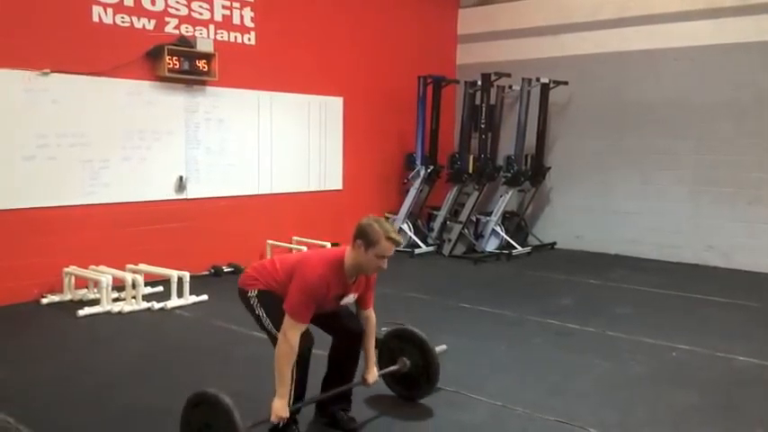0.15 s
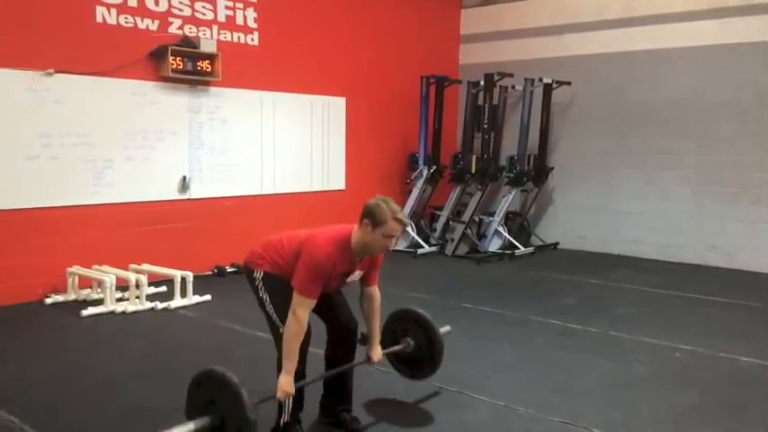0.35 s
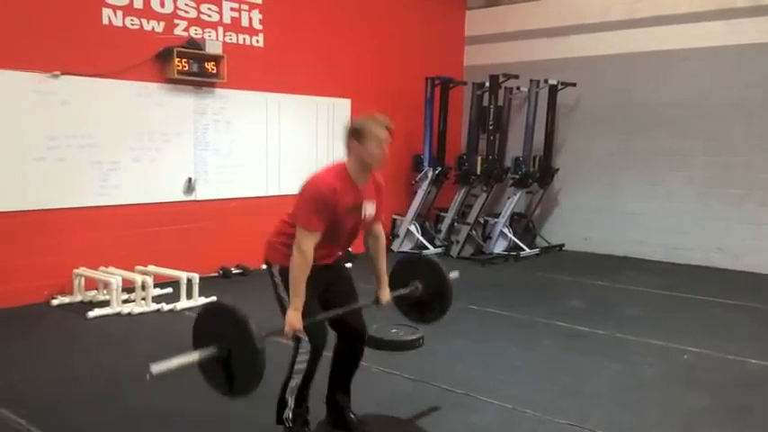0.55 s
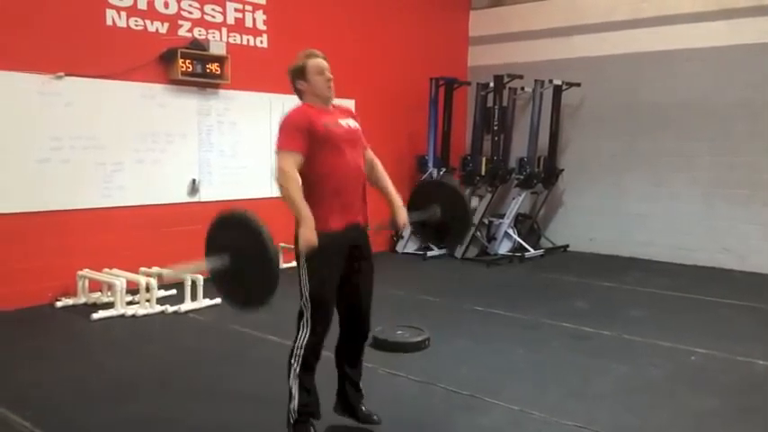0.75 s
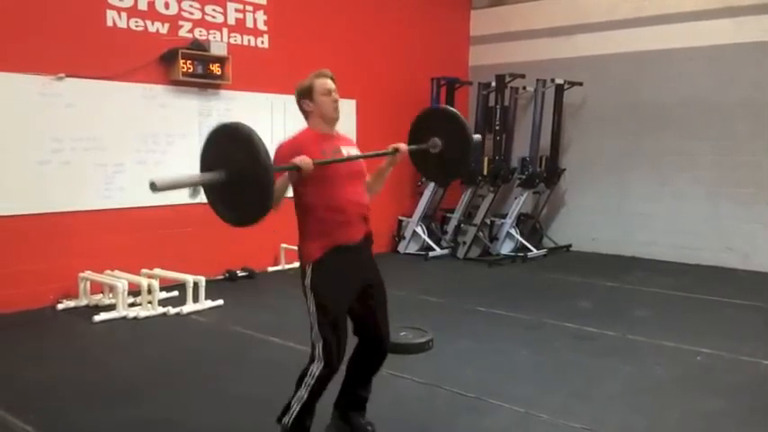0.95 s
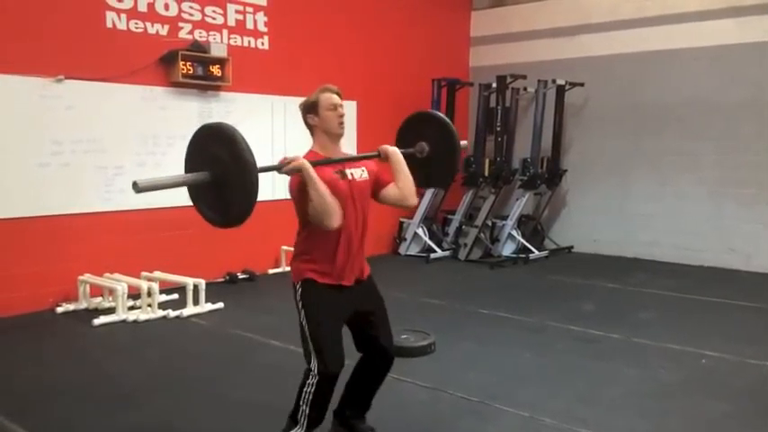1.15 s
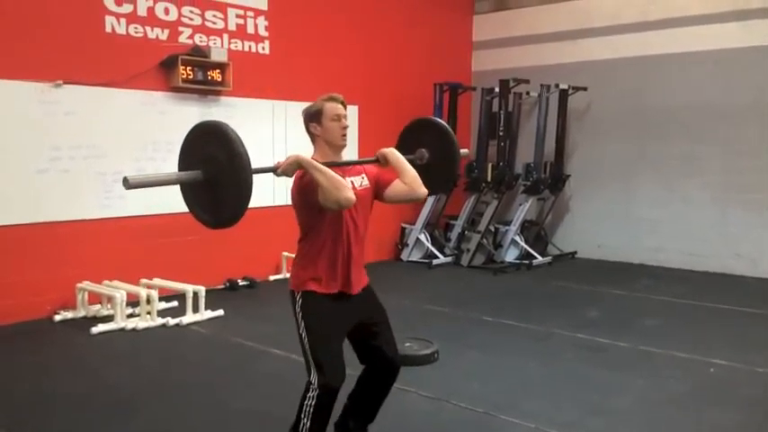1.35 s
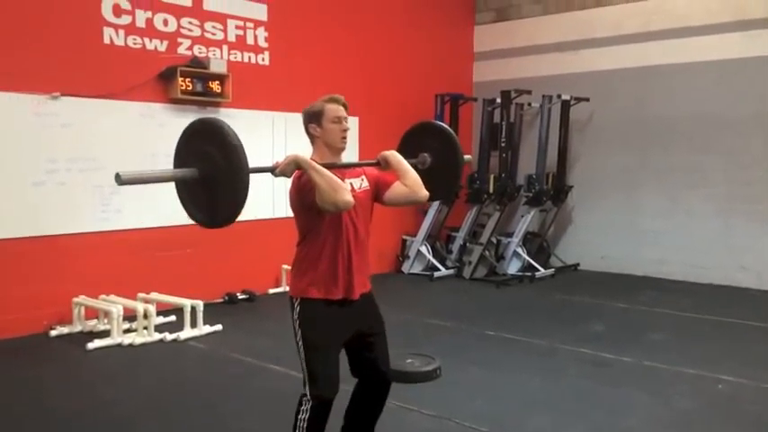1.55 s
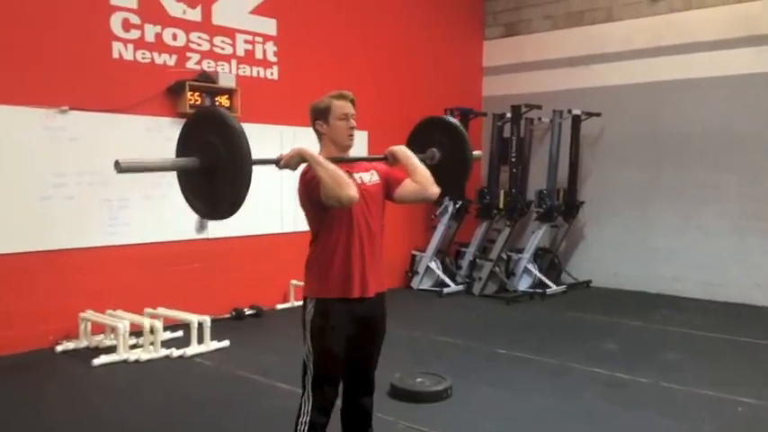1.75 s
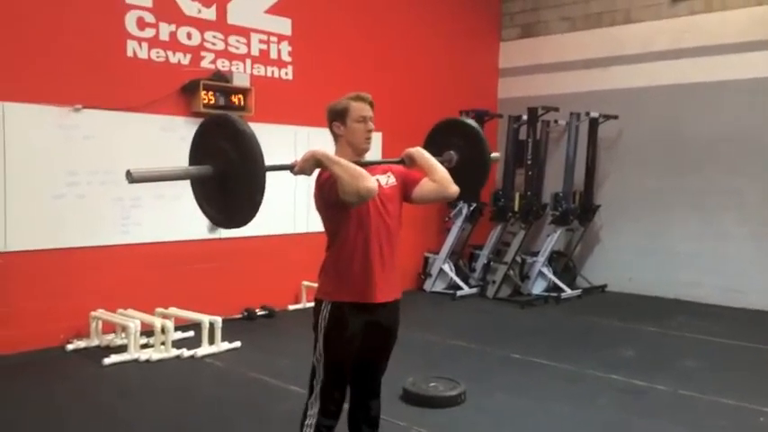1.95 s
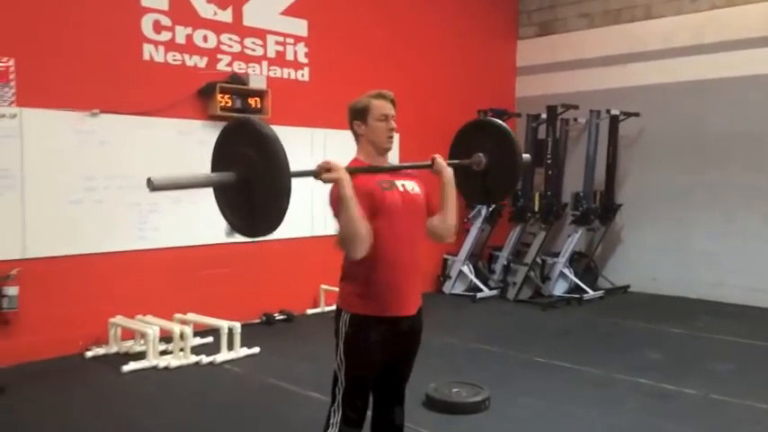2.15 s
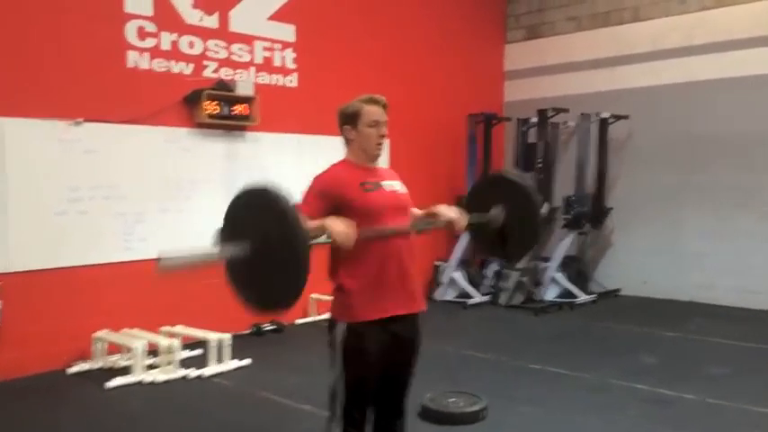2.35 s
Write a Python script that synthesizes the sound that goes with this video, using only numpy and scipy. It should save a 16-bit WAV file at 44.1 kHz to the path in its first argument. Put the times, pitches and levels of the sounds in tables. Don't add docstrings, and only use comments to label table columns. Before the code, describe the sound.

Bright steel barbell clatter with ringing sleeves and plates, then softer rubber slaps and dull knocks

```python
import sys
import numpy as np
from scipy import signal
from scipy.fft import rfft, irfft
from scipy.io import wavfile
from scipy.ndimage import uniform_filter1d

SR = 44100
rng = np.random.default_rng(int(sys.argv[2]) if len(sys.argv) > 2 else 0)


def persist_wave(psi):
    counts = np.round(np.clip(psi, -1, 1) * 32767).astype(np.int16)
    wavfile.write(sys.argv[1], SR, np.atleast_2d(counts).T)


def how_loud(loudness_db):
    steps = np.asarray(loudness_db, float) / 20
    return 10 ** steps


N = 110250


def evened(x):
    return x / np.sqrt(np.mean(x ** 2) + 1e-20)


def read(points, hz):
    f, value = np.transpose(points)
    return np.interp(np.log(hz + 1), np.log(f + 1), value)


def add(mix, s, sound):
    part = mix[round(s * SR):][:len(sound)]
    part += sound[:len(part)]


def coloured(x, points, tilt_db=0):
    hz = np.fft.rfftfreq(len(x), 1 / SR)
    gain_db = read(points, hz) - tilt_db * np.log2(hz / 3000 + 0.21)
    return irfft(rfft(x) * how_loud(gain_db), len(x))


def ring(x, hz, width):
    r = np.exp(-np.pi * width / SR)
    w = 2 * np.pi * hz / SR
    return signal.lfilter([(1 - r) * 2 * np.sin(w)], [1, -2 * r * np.cos(w), r * r], x)


# frequency in Hz, density in dB per Hz.
HUM_SPECTRUM = [(25, -29.5), (45, -8), (93, -2), (204, -6), (300, -15.5), (1000, -24.5), (1750, -23),
                (2600, -32), (15500, -47.5)]
HUM_DB = -56.5


def hum():
    lumps = evened(uniform_filter1d(rng.standard_normal(N), 3000))
    air = evened(coloured(rng.standard_normal(N), HUM_SPECTRUM + [(16000, -88)]))
    low = signal.sosfilt(signal.butter(2, 300, fs=SR, output="sos"), air)
    swell = how_loud(.8 * np.tanh(lumps)) - 1
    return how_loud(HUM_DB) * (air + low * swell)


# frequency in Hz, density in dB per Hz.
LINGER_SPECTRUM = [(290, -46.5), (500, -15.5), (610, 0), (755, -15), (1720, -8.5), (2610, -11.5),
                   (15000, -29)]
LINGER_DB, LINGER_T60_S = -63, 1.5


def linger():
    fall_db = 60 * np.arange(N) / SR / LINGER_T60_S
    return evened(coloured(rng.standard_normal(N), LINGER_SPECTRUM)) * how_loud(LINGER_DB - fall_db)


# frequency in Hz, density in dB per Hz.
CLOTH_SPECTRUM = [(1760, -55), (3000, -21), (5450, 1), (6050, 5), (8350, 5), (15500, 9)]
# middle in seconds, level in dB, half width in seconds.
BRUSHES = [
    (0.707, -58.5, 0.049),
    (.85, -72.5, .08),
    (2.275, -65, 0.023),
    (2.32, -75, 0.058),
    (1.102, -70, 0.11),
    (1.3, -73.5, 0.19),
    (1.821, -79, 0.083),
]


def brushes():
    t = np.arange(N) / SR
    hiss = evened(coloured(rng.standard_normal(N), [(1500, -41)] + CLOTH_SPECTRUM + [(16000, -80)]))
    return hiss * sum(how_loud(db) * np.exp(-((t - s) / half) ** 2) for s, db, half in BRUSHES)


# start in seconds, peak in dB, pitch in Hz, 60 dB decay in seconds.
THUMPS = [
    (0.019, -49.5, 82, 0.12),
    (.232, -41, 171, 0.18),
    (.24, -42, 89.5, 0.13),
    (0.264, -39, 104, 0.081),
    (0.261, -42, 134.3, .12),
    (1.002, -54.5, 156.6, 0.1),
]


def thumps():
    out, t = np.zeros(N), np.arange(12000) / SR
    for s, db, hz, t60 in THUMPS:
        swell = 1 - np.exp(-t / .012)
        add(out, s, how_loud(db - 60 * (t / t60) ** 2) * swell * 2 * np.sin(2 * np.pi * hz * t))
    return coloured(out, [(40, -20), (70, 1.0)])


# start in seconds, peak in dB, pitch in Hz, tick in dB.
SLAPS = [
    (.2186, -24, 850, -30),
    (.2218, -30, 600, -30),
    (.9804, -25, 1000, -16),
    (.9822, -36, 1500, -9),
    (.9957, -20, 1200, 2),
    (1.002, -33, 1300, -20),
    (1.0168, -34, 1400, 9),
    (1.027, -38, 2500, 1),
    (2.3445, -46, 680, -18),
]
SLAP_RING_CYCLES, TICK_S = .3, .00003


def slaps():
    out, t = np.zeros(N), np.arange(600) / SR
    for s, db, hz, tick_db in SLAPS:
        u = t * hz / SLAP_RING_CYCLES
        pocket = 2 * u ** 2 * np.exp(-u) * np.sin(2 * np.pi * hz * t - 2.4)
        tick = -how_loud(tick_db) * np.exp(-((t - .0003) / TICK_S) ** 2)
        add(out, s, how_loud(db) * (pocket + tick))
    return signal.sosfilt(signal.butter(2, 400, "high", fs=SR, output="sos"), out)


CHATTER_PER_S, CHATTER_SPREAD_DB, CONTACT_S = 14000, 4.5, 0.0011
SLEEVE_DB, SLEEVE_WIDTH_HZ = -2, 330
LOUDEST_DB, LOUDEST_WIDTH = -5.5, 0.067
LEAD = 64


def chatter(table, colour):
    out, t = np.zeros(N), np.arange(4096) / SR
    for s, db, length, dull_db, top_hz in table:
        hit, size, sign = rng.random((3, 4096))
        strength = how_loud(-CHATTER_SPREAD_DB * np.log(size + 0.04)) * np.sign(sign - .5)
        ticks = (hit < CHATTER_PER_S / SR) * strength
        ticks[0] = 2
        ticks = ticks * np.exp(-(t / length) ** 2) * (.3 + .7 * np.minimum(t / CONTACT_S, 1))
        ticks = coloured(np.roll(ticks, LEAD), colour, dull_db)
        modes_hz = np.linspace(600, 14600, 36) + rng.uniform(-190, 190, 36)
        sleeve = sum(ring(ticks, hz, SLEEVE_WIDTH_HZ) for hz in modes_hz)
        loudest = ring(evened(ticks), top_hz, LOUDEST_WIDTH * top_hz)
        burst = evened(ticks) + how_loud(SLEEVE_DB) * evened(sleeve) + how_loud(LOUDEST_DB) * evened(loudest)
        add(out, s - LEAD / SR, how_loud(db) * burst / np.sqrt(np.sum(burst ** 2) / (length * SR)))
    return out


# frequency in Hz, width in Hz, level in dB.
PLATE_MODES = [(1250, 66, -5.5), (3480, 82, -0.5), (4870, 120, -6), (5120, 76, 2.5), (7900, 63, -6.5),
               (12000, 95, -8), (13200, 30, -26.5), (14700, 36, -5.5)]
# frequency in Hz, level in dB, 60 dB decay in seconds.
BAR_MODES = [(1830, -22.5, 1.5), (2875, -11.5, 1.8), (3300, -0.5, 0.17), (3505, -21, 5.1),
             (4160, -12.5, 0.87), (4355, -1, 0.93), (4554, -11, 0.68), (4960, -3, 0.22), (5055, -20.5, 1.2),
             (5496, -12.5, 0.93), (6272, -20, 1.0), (6955, -20.5, 1.2), (7305, -23, 0.8), (8387, -29, 0.89)]
PLATE_MODES_DB, BAR_MODES_DB = -15.5, -26


def barbell(table, colour):
    out = chatter(table, colour)
    plates = sum(how_loud(db) * ring(out, hz, width) for hz, width, db in PLATE_MODES)
    bar = sum(how_loud(db) * ring(out, hz, 2.2 / t60) * np.sqrt(1 / t60 + 1) for hz, db, t60 in BAR_MODES)
    return out + np.std(out) * (how_loud(PLATE_MODES_DB) * evened(plates) + how_loud(BAR_MODES_DB) * evened(bar))


# start in seconds, level in dB, chatter length in seconds,
# dullness in dB per octave, loudest ring in Hz.
KNOCKS = [(1.012, -45.5, 0.0086, -1, 1790), (1.033, -45, 0.0082, 17, 798), (1.052, -47, 0.021, 13, 597),
          (1.074, -57.5, .004, -8, 2000), (1.3, -55.5, .02, 8, 599.5), (2.3755, -49, .005, 1, 1910),
          (2.3945, -44, 0.0044, 0.5, 900), (2.3795, -41, 0.015, .5, 2107), (2.388, -38, 0.0085, 0.8, 1855),
          (2.403, -44, 0.0097, 2, 880), (2.419, -56, .008, .1, 2090), (2.466, -59, .015, -2, 2600)]
# frequency in Hz, density in dB per Hz.
KNOCK_SPECTRUM = [(180, -30), (300, -23), (571, -16.5), (863, -7.5), (1460, -14), (1810, -4), (2610, -13.5),
                  (4570, -13.5), (15500, -43)]


def plate_knocks():
    return barbell(KNOCKS, KNOCK_SPECTRUM)


# start in seconds, level in dB, chatter length in seconds,
# dullness in dB per octave, loudest ring in Hz.
CLANKS = [(.2257, -14, 0.0048, -3, 7020), (.2315, -14.5, 0.0064, 1.64, 3710),
          (.2365, -18.5, 0.0024, .3, 3540), (.249, -14, .004, 0.4, 5350), (.258, -22.5, 0.024, -1.9, 3017),
          (0.283, -22.5, 0.0094, 2.8, 2903), (.24, -21.5, 0.01, -0.46, 1250), (1.137, -43.5, .01, 4, 1084),
          (1.158, -55.5, 0.0049, -5, 12000), (1.701, -57.5, 0.002, 0, 4730), (2.411, -52, .014, 3.1, 6934),
          (2.443, -66, 0.015, -2, 5160)]
# frequency in Hz, density in dB per Hz.
CLANK_SPECTRUM = [(250, -21.5), (480, -18.5), (800, -15.5), (1200, -4.5), (2300, -8), (4900, -2),
                  (10300, -12), (14500, -8)]
# frequency in Hz, gain in dB.
SHADOW = [(12600, 0), (13400, -20.5), (14000, -6.5)]


def sleeve_clanks():
    return coloured(barbell(CLANKS, CLANK_SPECTRUM), SHADOW)


# frequency in Hz, 60 dB decay in seconds.
HALL_T60 = [(260, 1.5), (620, 2.9), (950, 1), (1840, 1.8), (3200, 1.61), (6000, 1.4), (9000, 0.89),
            (14000, .5)]
# frequency in Hz, gain in dB.
FAR_END = [(420, -5.5), (610, 2), (850, -6), (1400, -4.5), (1800, 2), (2800, 3.5), (5000, 0), (9000, -1)]
NEAR_DB, NEAR_SHARE, NEAR_RISE_S = -0.5, 0.33, 0.004
FAR_DB, FAR_RISE_S = -2, .03
ECHO_DB, ECHO_S, ECHO_SPREAD_S = -18, .4, .09


def hall(x):
    hz, t, z = signal.stft(rng.standard_normal(N), SR, nperseg=256)
    fall = 60 * t / read(HALL_T60, hz)[:, None]
    late = read(FAR_END, hz)[:, None] - fall
    near = how_loud(NEAR_DB - fall / NEAR_SHARE) ** 2 * (1 - np.exp(-t / NEAR_RISE_S)) / NEAR_SHARE
    far = how_loud(FAR_DB + late) ** 2 * (1 - np.exp(-t / FAR_RISE_S))
    echo = how_loud(ECHO_DB + 15 + late) ** 2 * np.exp(-((t - ECHO_S) / ECHO_SPREAD_S) ** 2)
    tail = signal.istft(z * np.sqrt(near + far + echo), SR, nperseg=256)[1][:N]
    return signal.fftconvolve(x, tail / np.sqrt(.1 * SR))[:N]


KNOCK_WET_DB, SLAP_WET_DB = -7, -2.5
WALL_S = 0.012


def scene():
    steel = sleeve_clanks()
    plates = plate_knocks()
    rubber = slaps()
    rubber_at_wall = np.roll(rubber, round(WALL_S * SR))
    wet = hall(steel + how_loud(KNOCK_WET_DB) * plates + how_loud(SLAP_WET_DB) * rubber_at_wall)
    direct = steel + plates + rubber + thumps()
    return (direct + wet + brushes() + hum() + linger())[None]


def roll_off(x):
    return signal.sosfilt(signal.butter(12, 16500, fs=SR, output="sos"), x)


# frequency in Hz, gain in dB.
MICROPHONE = [(5300, 0), (5800, -1.5), (6300, 0), (15150, -3), (15600, -48)]


def record(dry):
    return roll_off(coloured(dry[0], MICROPHONE)[None])


dry = scene()
out = record(dry)
persist_wave(out)
```